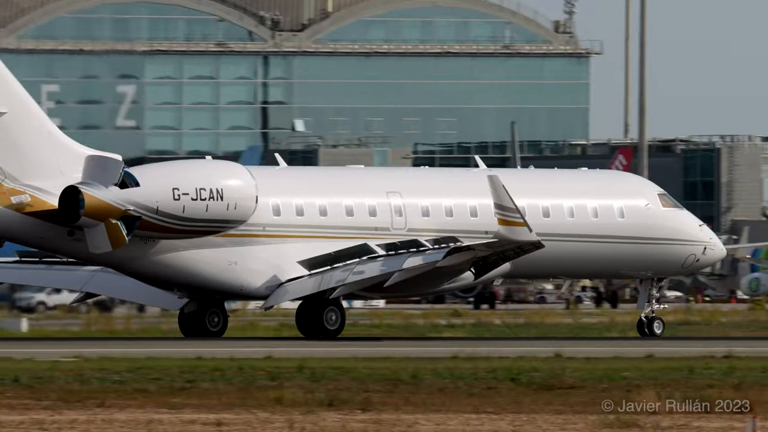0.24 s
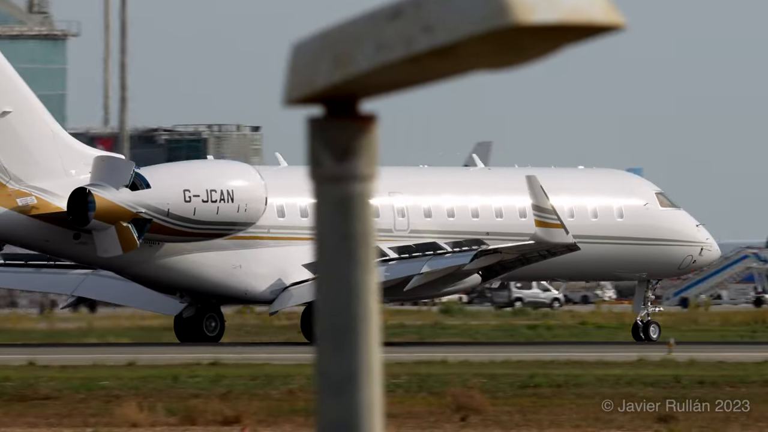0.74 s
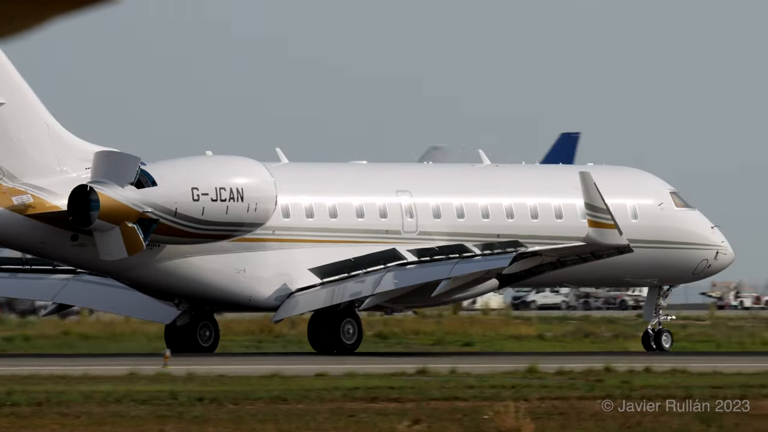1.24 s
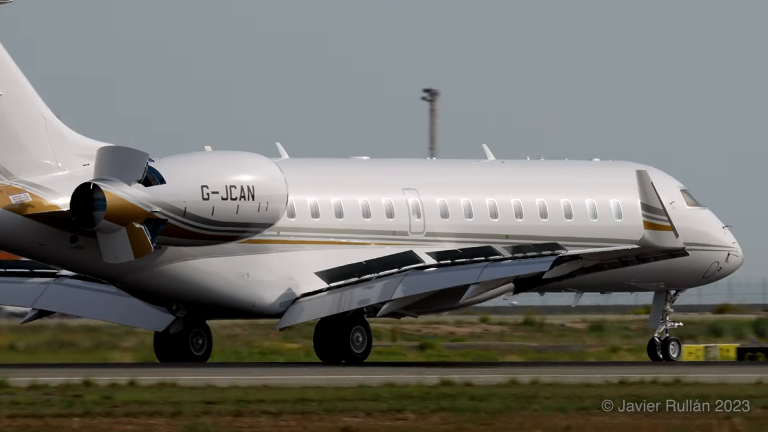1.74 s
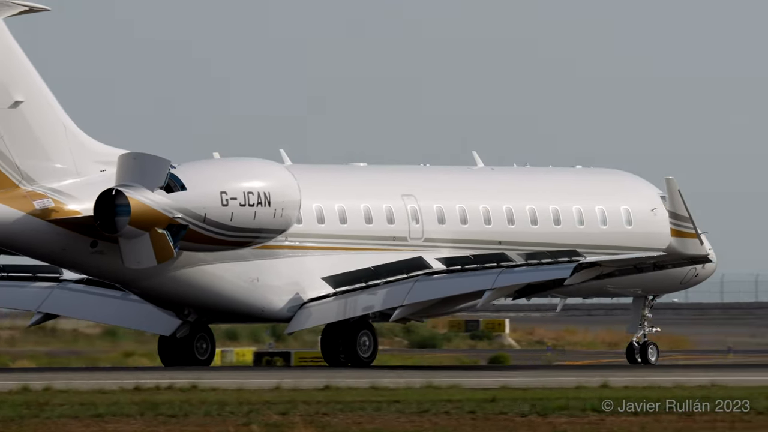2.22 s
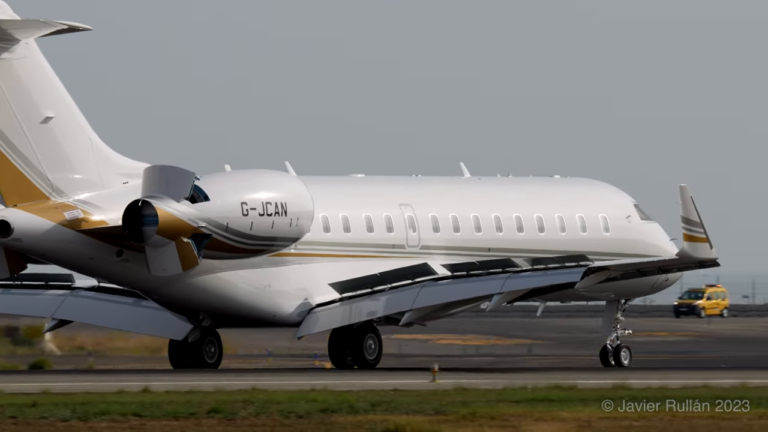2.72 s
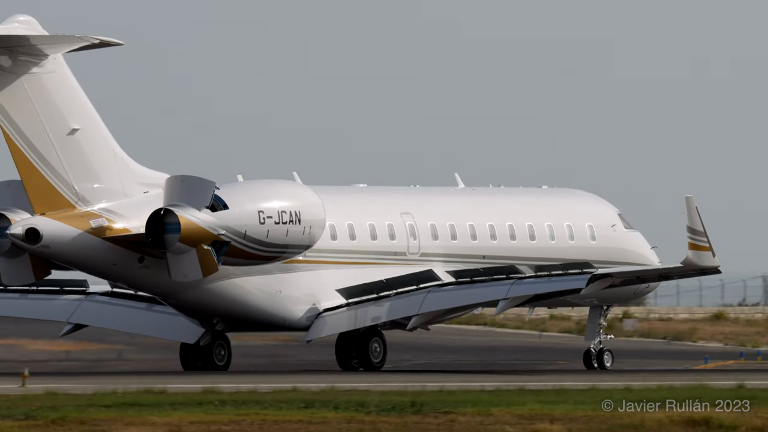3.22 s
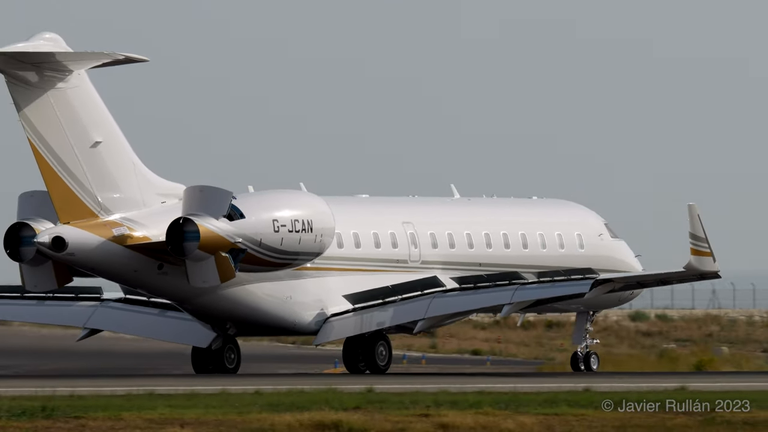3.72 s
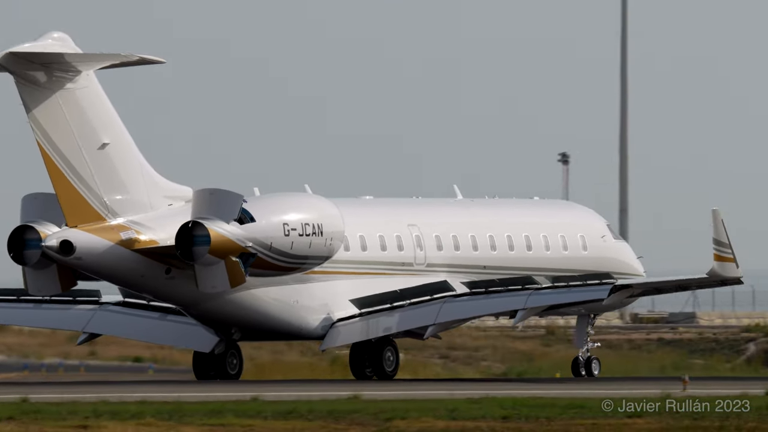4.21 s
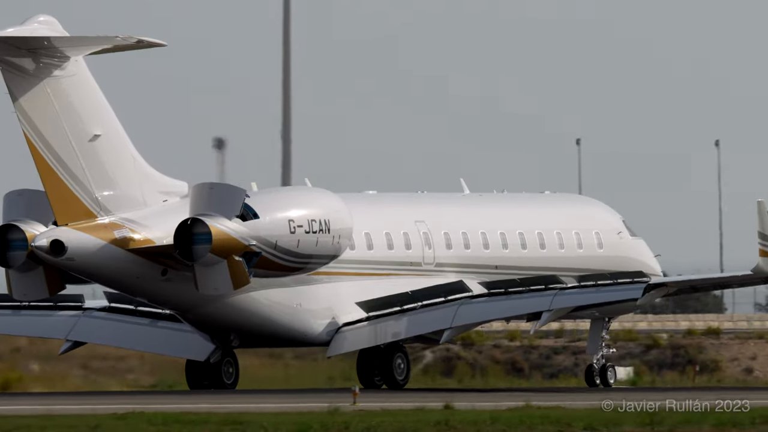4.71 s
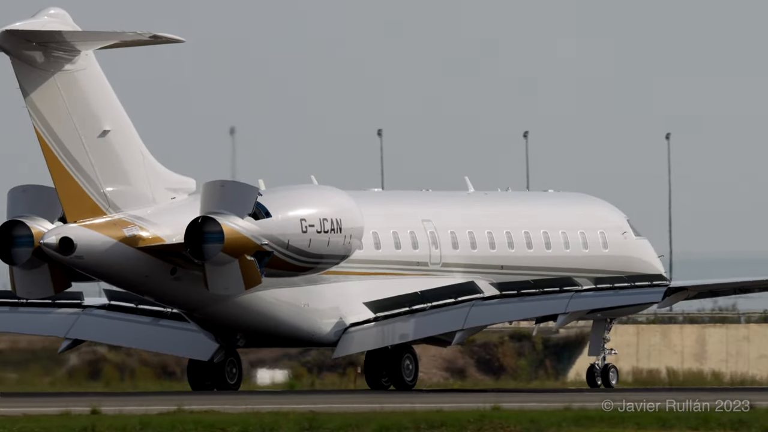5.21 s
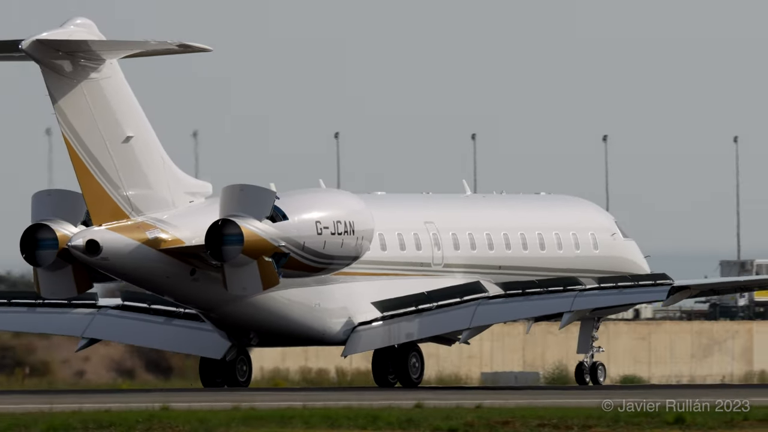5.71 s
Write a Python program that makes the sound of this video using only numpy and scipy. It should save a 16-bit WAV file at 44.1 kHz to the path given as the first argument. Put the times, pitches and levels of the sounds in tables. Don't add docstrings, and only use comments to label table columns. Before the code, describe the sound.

Across open airfield grass, a business jet slows on the runway with reversers open. Its exhaust is a loud, continuous broadband rush, strongest in the middle and upper-middle range, fluttering finely in moving air. It surges unevenly for three seconds, then eases slightly. A faint, wavering fan whine near two kilohertz comes and goes, clearest around four seconds. One distant camera microphone, same in both channels, with tiny gain jumps.

```python
import sys
import numpy as np
from scipy import signal
from scipy.fft import rfft, irfft
from scipy.io import wavfile
from scipy.ndimage import uniform_filter1d, minimum_filter1d

SR = 44100
rng = np.random.default_rng(int(sys.argv[2]) if len(sys.argv) > 2 else 0)


def to_wav(sig):
    pcm = np.clip(np.atleast_2d(sig), -1, 1) * 32767
    pcm = np.round(pcm).astype(np.int16)
    wavfile.write(sys.argv[1], SR, pcm.T)


def to_linear_factor(level_db):
    exponent = np.asarray(level_db, float) / 20
    return 10 ** exponent


N = 262395

REGION_HZ = [190, 340, 700, 1500, 2800, 6200]
# (frequency [Hz], level per Hz [dB])
JET_COLOUR = [(25, -52), (95, -32), (145, -20), (330, -13), (600, -5.5), (800, -1), (1100, -2), (2100, .5),
              (3000, -3), (4300, -9), (4900, -15), (5800, -18.5), (7400, -26.5), (8800, -38), (9900, -51.5),
              (12300, -64), (14000, -95)]
# (frequency [Hz], width [octaves], level [dB])
GRASS_DIP = (246.4, 0.23, -7)
# (time [s], level against its mean [dB])
THRUST = [(0, -0.4), (.4, 0.8), (.85, 0.2), (1, 0.3), (1.6, 2), (1.74, 0.9), (1.95, 2.5), (2.15, 0.9),
          (2.5, 1.3), (2.9, 0.7), (3.12, 2), (3.5, -1.5), (3.76, 0.5), (3.96, -2.5), (4.53, 0), (5.58, -2),
          (5.75, -.9), (5.95, -1.5)]
THRUST_SHARE = [.6, 0.74, 0.92, 1.24, 1.56, 0.64]
DRIFT_DB_PER_S = [.8, -0.82, -0.29, -0.3, .15, -1]
SIDE_ON_DB = [2, 1.5, 1.2, -1, -1.3, -0.3]
# (time [s], half length [s], level [dB], centre [Hz])
POCKETS = [(0.298, 0.57, 2.5, 5000), (0.797, 0.25, 2.6, 1480), (.84, 0.27, -3, 6400),
           (1.367, 0.17, -3, 630), (1.9, 0.49, 3, 350), (2.12, 0.21, -3.5, 200), (2.252, 0.22, -2.5, 1170),
           (2.43, 0.054, 2, 5000), (2.634, 0.097, 1.3, 625), (3.4, .3, 1.2, 7000), (3.722, .1, -4, 900),
           (4.12, 0.39, 1.3, 450), (4.746, 0.16, -2, 1110), (5.4, 0.13, -2.5, 7500)]
# (time [s], frequency [Hz], level [dB])
WHINE = [
    (0, 1977, -44),
    (2, 1950, -41),
    (4, 1930, -35.5),
    (5.95, 1873, -48),
]
# (time [s], tick peak [dB], sudden level change [dB])
GAIN_STEPS = [
    (0.1301, -58, -1),
    (0.605, -53, 2.5),
    (0.6435, -52, -2.5),
    (1.1165, -51, 2),
    (1.679, -49, -4.5),
    (1.8854, -62, -3),
    (1.9924, -62, -3),
    (2.868, -61, -1),
    (3.1484, -60, -2),
]
# (frequency [Hz], level per Hz [dB])
HISS_COLOUR = [(2000, 11), (9000, 4.5), (15700, -2)]


def curve(s, values):
    return np.interp(np.arange(N) / SR, s, values)


def colour(hz, table):
    f, db = np.transpose(table)
    return to_linear_factor(np.interp(np.log(hz + 1e-9), np.log(f), db))


def band_rms(spectrum, hz, lo, hi):
    return np.std(irfft(spectrum * ((hz > lo) & (hz < hi)), N))


def walk(rate):
    hold = int(SR / rate)
    x = np.repeat(rng.standard_normal(N // hold + 1), hold)
    x = uniform_filter1d(uniform_filter1d(x, hold), hold)[:N]
    return (x - x.mean()) / x.std()


def flutter(rate):
    x = walk(rate)
    return x - uniform_filter1d(x, size=SR // 8)


def region_levels(t):
    side_on_s, span_s = 2.57, 2.97
    arch = 1 / 3 - ((t - side_on_s) / span_s) ** 2
    thrust = np.outer(THRUST_SHARE, curve(*np.transpose(THRUST)))
    drift = np.outer(DRIFT_DB_PER_S, t - t.mean())
    return thrust + drift + np.outer(SIDE_ON_DB, arch)


def air_pockets(t, centre):
    total = 0
    for at, half, db, hz in POCKETS:
        octaves = np.log2(centre / hz)
        if abs(octaves) < 2:
            total = total + db * np.exp(-(octaves / 0.75) ** 2) * np.exp(-((t - at) / half) ** 2)
    return total


def exhaust():
    t = np.arange(N) / SR
    regions = region_levels(t)
    hz = np.fft.rfftfreq(N, 1 / SR)
    dip_hz, width, dip_db = GRASS_DIP
    grass = to_linear_factor(dip_db * np.exp(-(np.log2((hz + 1e-9) / dip_hz) / width) ** 2))
    noise = rfft(rng.standard_normal(N)) * colour(hz, JET_COLOUR) * grass
    noise *= to_linear_factor(-14.5) / band_rms(noise, hz, 1100, 3600)
    place = np.clip(3 * np.log2((hz + 1e-9) / 50), 0, 23)
    eddy, quick = flutter(32), flutter(45)
    out = 0
    for k in range(24):
        centre = 50 * 2 ** (k / 3)
        weights = [np.interp(np.log(centre), np.log(REGION_HZ), row) for row in np.eye(6)]
        eddy = .5 * eddy + .87 * flutter(32)
        shake = np.clip(np.log2(centre / 150) / 4, .2, .85)
        db = weights @ regions + air_pockets(t, centre)
        db = db + shake * (1.2 * eddy + .55 * quick)
        band = irfft(noise * np.clip(1 - abs(place - k), 0, 1), N)
        out = out + to_linear_factor(db) * band
    return out


def fan():
    s, hz, db = np.transpose(WHINE)
    wavering_hz = curve(s, hz) * (1 + 0.0052 * walk(6))
    phase = np.cumsum(wavering_hz) / SR
    level = to_linear_factor(curve(s, db) + 4.4 * walk(16))
    return level * np.sqrt(2) * np.sin(2 * np.pi * phase)


def housing_echo(dry):
    delay_s, share, from_hz = .00114, .15, 4600
    high_pass = signal.butter(2, from_hz, "high", fs=SR, output="sos")
    treble = signal.sosfilt(high_pass, dry)
    return share * np.roll(treble, int(delay_s * SR), axis=1)


def preamp():
    start_db, top_db, rise_s = -86, -61.5, 2.2
    early_end_s, early_db = .56, -12
    hz = np.fft.rfftfreq(N, 1 / SR)
    noise = rfft(rng.standard_normal(N)) * colour(hz, HISS_COLOUR)
    t = np.arange(N) / SR
    db = top_db - (top_db - start_db) * np.exp(-t / rise_s)
    db = db + early_db * (t < early_end_s)
    hiss = irfft(noise, N) / band_rms(noise, hz, 11500, 15500) * to_linear_factor(db)
    for at, peak_db, _ in GAIN_STEPS:
        hiss[int(at * SR)] += to_linear_factor(peak_db + 14.5)
    return hiss


def gain_control(x):
    attack_s, release_s, ceiling = 0.0011, .045, .86
    t = np.arange(N) / SR
    db = 0
    for at, _, change_db in GAIN_STEPS:
        rise = np.clip((t - at) / attack_s, 0, 1)
        db = db + change_db * rise * np.exp(-np.maximum(t - at, 0) / release_s)
    x = x * to_linear_factor(db)
    room = minimum_filter1d(np.minimum(1, ceiling / (abs(x) + 1e-9)), size=301)
    return x * uniform_filter1d(uniform_filter1d(room, size=151), size=151)


def scene():
    return np.tile(exhaust() + fan(), (2, 1))


def top_cut(x):
    return signal.sosfilt(signal.butter(12, 15730, fs=SR, output="sos"), x)


def record(dry):
    held = gain_control(dry + housing_echo(dry))
    return top_cut(held + preamp())


dry = scene()
out = record(dry)
to_wav(out)
```